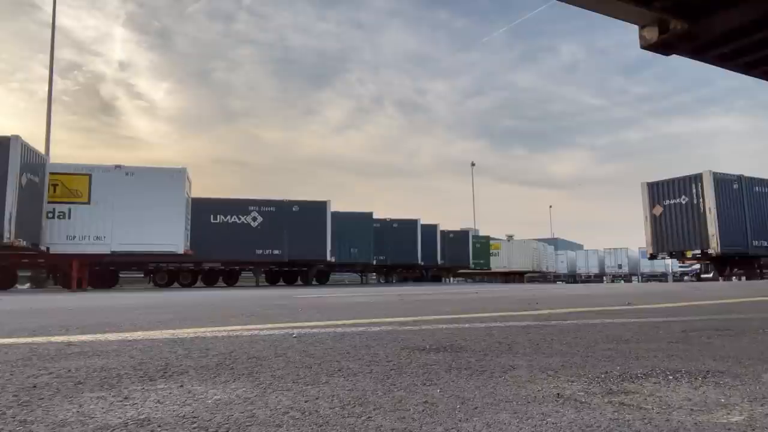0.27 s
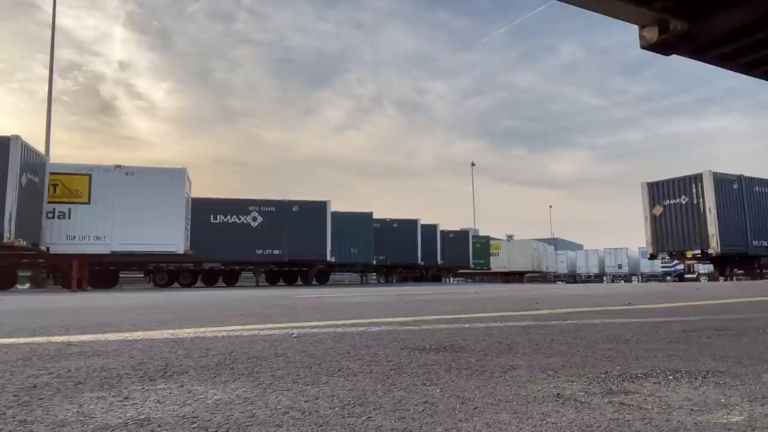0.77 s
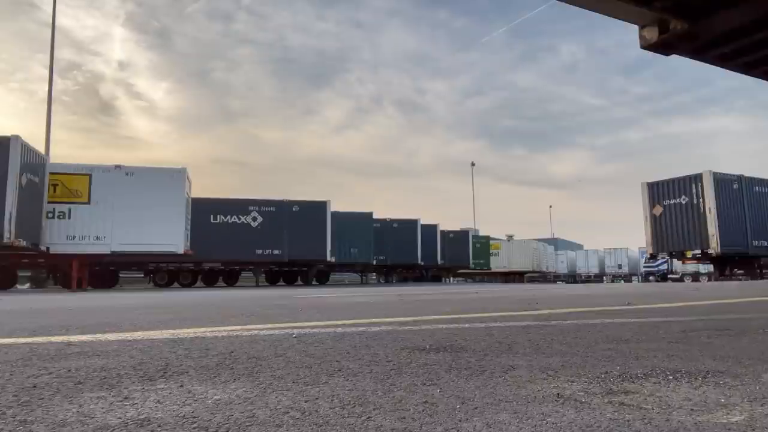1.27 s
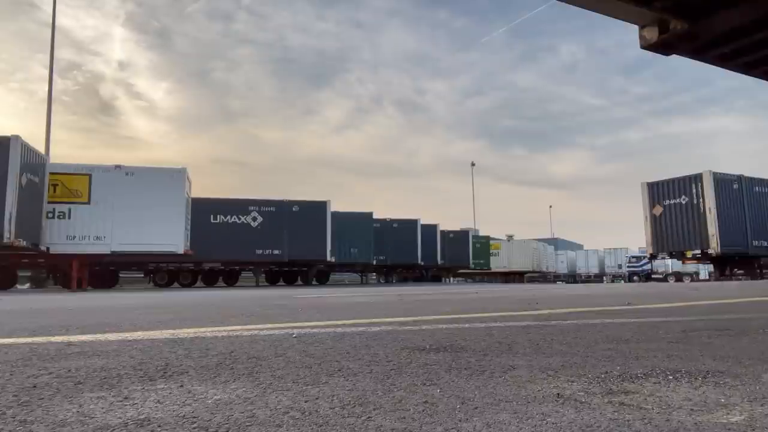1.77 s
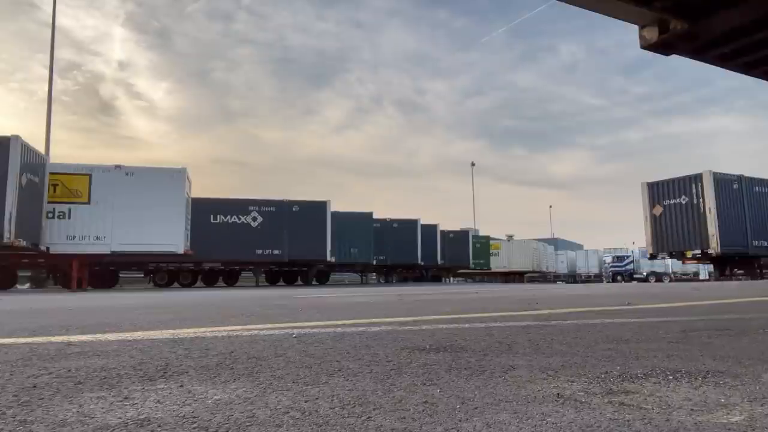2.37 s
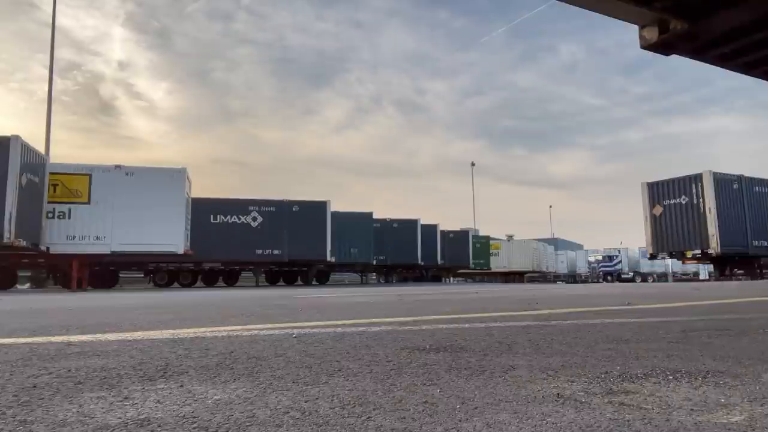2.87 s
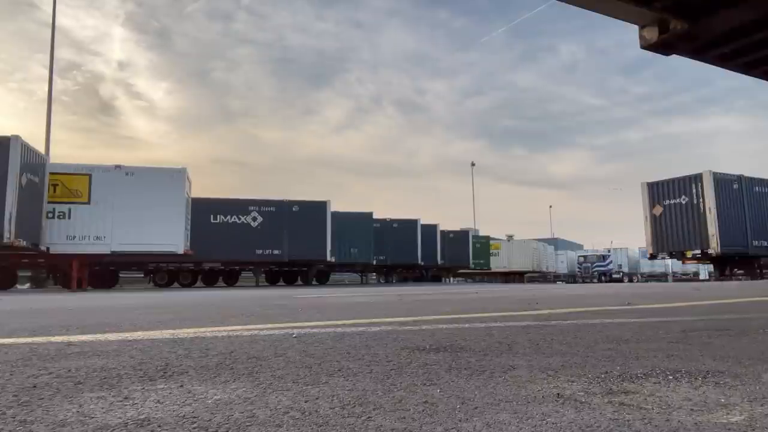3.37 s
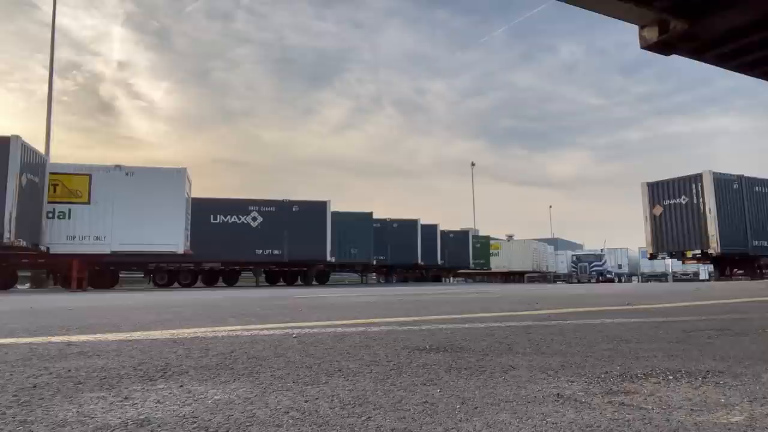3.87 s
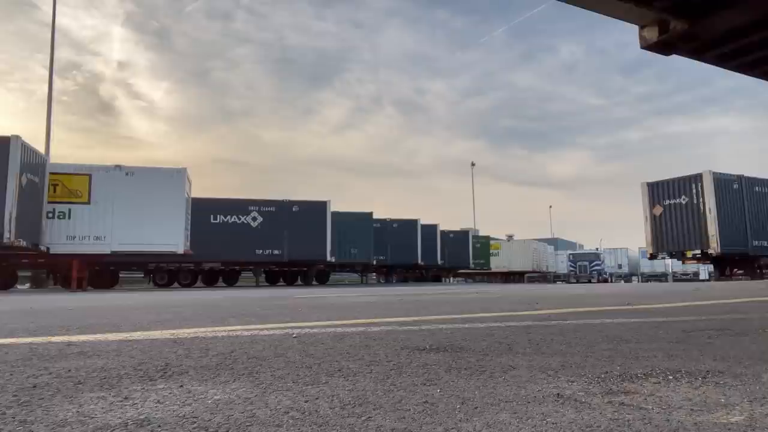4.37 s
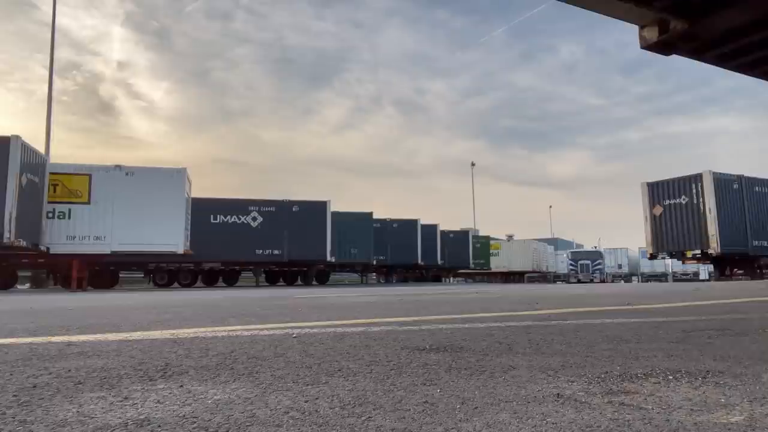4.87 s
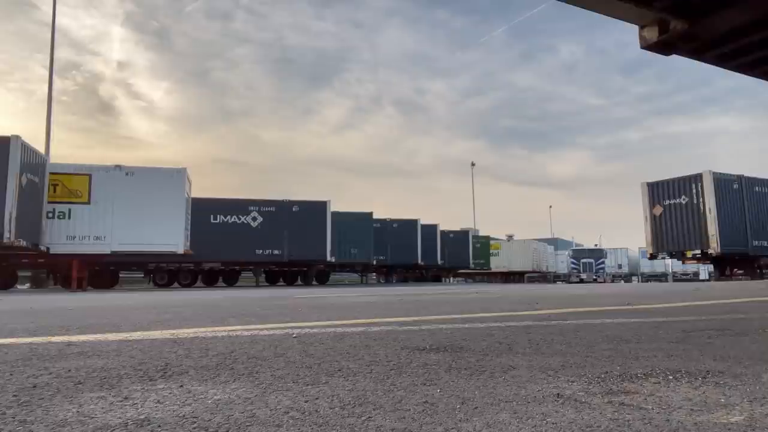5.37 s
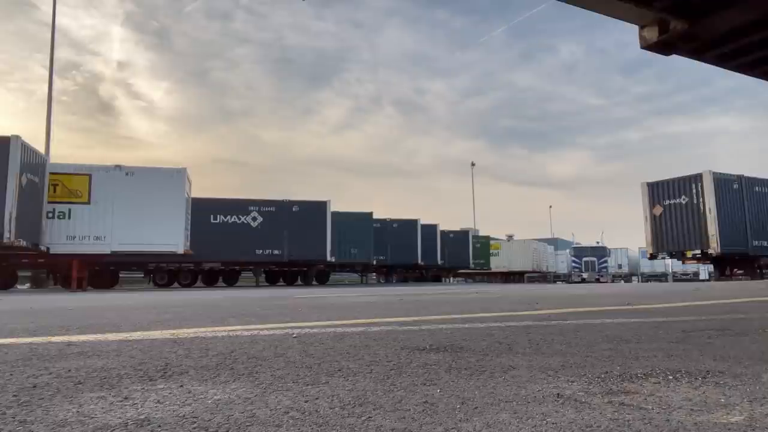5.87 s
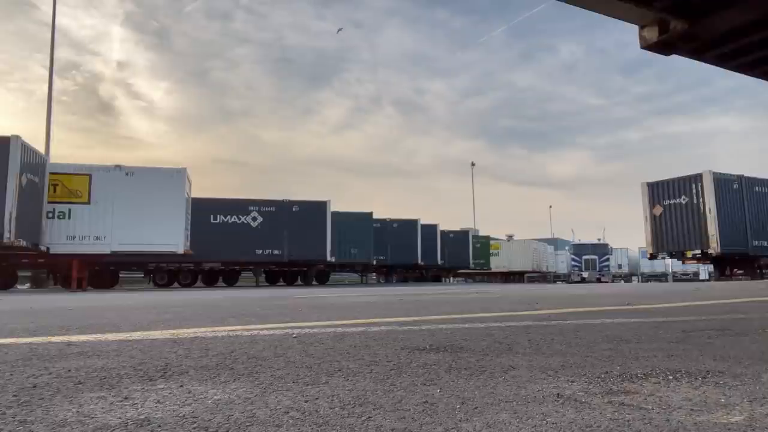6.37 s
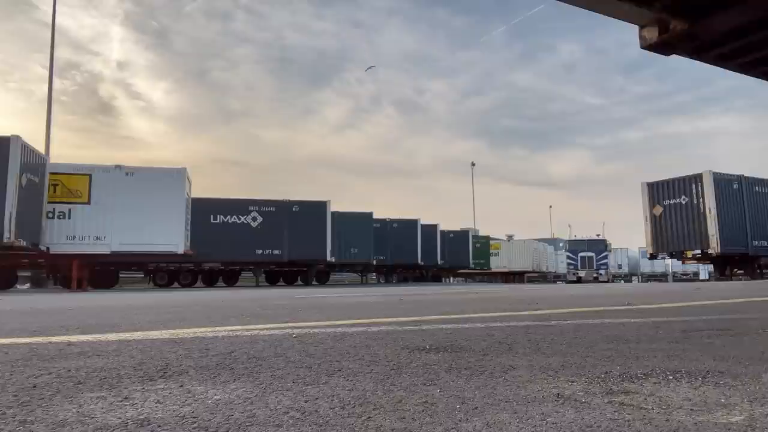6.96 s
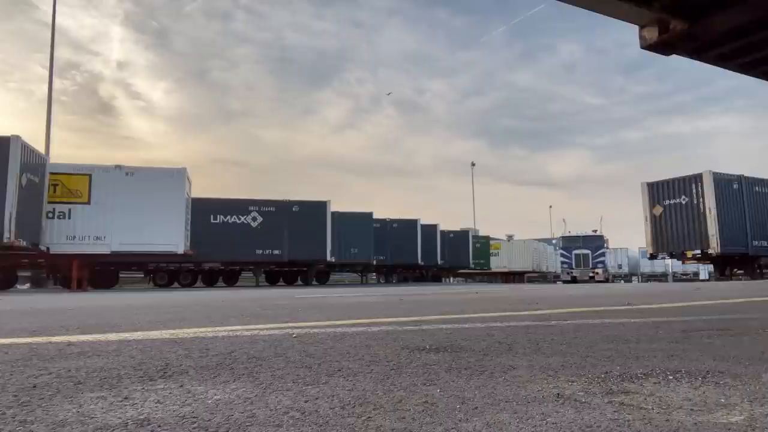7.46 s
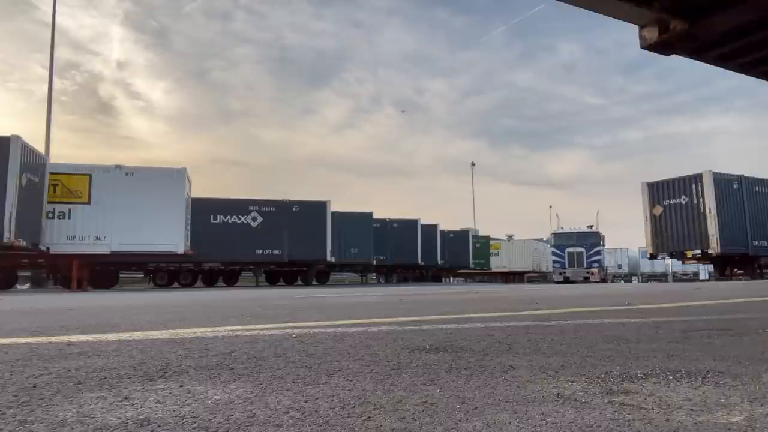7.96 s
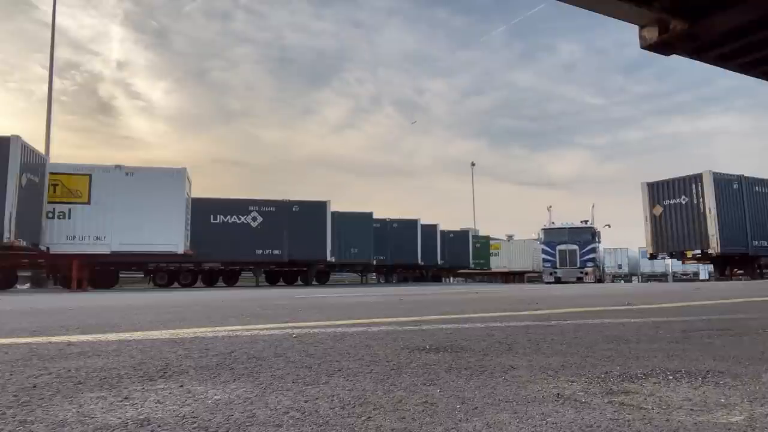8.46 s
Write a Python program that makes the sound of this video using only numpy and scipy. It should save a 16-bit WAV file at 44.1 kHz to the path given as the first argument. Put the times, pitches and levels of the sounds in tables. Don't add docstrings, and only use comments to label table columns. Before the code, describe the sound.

Over low yard rumble, a big six-cylinder engine eases, pulls harder and climbs with a breathy turbo whine, nearing until its note sinks.

```python
import sys
import numpy as np
from scipy import signal
from scipy.fft import rfft, irfft, next_fast_len
from scipy.io import wavfile
from scipy.ndimage import uniform_filter1d, map_coordinates

SR = 44100
rng = np.random.default_rng(int(sys.argv[2]) if len(sys.argv) > 2 else 0)


def volts_from_db(level):
    exponent = np.asarray(level, float) / 20
    return 10 ** exponent


def materialize(psi):
    bounded = np.clip(np.atleast_2d(psi).T, -1, 1)
    quanta = np.round(bounded * 32767).astype(np.int16)
    wavfile.write(sys.argv[1], SR, quanta)


N = 383669

# (frequency [Hz], level [dB per Hz])
RUMBLE_SPECTRUM = [(20, -42), (35, -12), (55, -4.5), (90, -6.5), (130, -4), (250, -7), (450, -14),
                   (900, -120)]
# (time [s], level [dB])
IDLER_LEVEL = [(0, -26), (.55, -20), (.9, -26), (1.2, -31), (2, -29.5), (3, -32.5), (8.7, -50.5)]
# (frequency [Hz], level [dB])
IDLER_LINES = [(45, -15.5), (68, -1), (78, -7.5), (91, -1.5)]
# (time [s], level [dB])
INSECT_LEVEL = [(0, -83), (3.8, -84), (4.4, -76.5), (6.2, -76), (7.2, -82), (8.7, -84)]
# (time [s], peak level [dB], frequency [Hz])
GRIT_TICKS = [
    (0.9767, -57, 7450),
    (0.981, -58, 8350),
    (1.2818, -54, 8320),
    (1.9535, -57, 7150),
    (2.006, -54, 7270),
]
# (start [s], end [s], from [Hz], to [Hz], level [dB])
SWEPT_BANDS = [(2.1, 3.1, 5200, 5700, -64), (4.45, 5.9, 5900, 6350, -59), (5.5, 6.1, 2500, 3300, -50),
               (6.2, 6.8, 2700, 3500, -47), (6.95, 7.5, 2300, 3100, -48), (7.85, 8.7, 2500, 4300, -46),
               (7.85, 8.75, 2750, 2900, -46), (8.3, 9, 3000, 3700, -47), (7.8, 8.9, 2100, 2150, -45),
               (5.15, 5.7, 1450, 1550, -44), (7.8, 9.1, 1500, 1850, -37)]
# (frequency [Hz], level [dB per Hz])
ROAR_SPECTRUM = [(160, -14), (280, -3.5), (343, -2.5), (376, -5), (455, -3.5), (615, 1.5), (892, -6.5),
                 (1500, -24), (1950, -55.5), (3300, -120)]
# (frequency [Hz], level [dB per Hz])
CLATTER_SPECTRUM = [(500, -57.5), (900, 0), (1600, 1.5), (2200, -4), (3200, -10.5), (4500, -16),
                    (6000, -30), (8000, -58.5), (10000, -120)]
# (frequency [Hz], level [dB per Hz])
HISS_SPECTRUM = [(3000, -65.5), (5000, 0.5), (7000, 0), (8500, -8), (10000, -16.5), (12000, -20.5),
                 (13500, -35.5), (15000, -120)]
# (frequency [Hz], left-right correlation [-1 to 1])
LIKENESS = [(60, 0.9), (150, .93), (300, 0.39), (500, 0.69), (800, 0.94), (1500, 0.39), (4000, 0.43),
            (7500, 0.08), (9000, 0.35)]
# (time [s], blade tone [Hz], level [dB])
TURBO_BLADES = [(0, 3600, -62), (1, 3450, -60), (1.1, 3460, -48.5), (1.38, 3515, -52), (1.52, 3590, -46.5),
                (1.9, 3720, -47), (2.25, 3780, -53), (2.7, 3890, -52), (3.1, 4080, -58), (4.55, 4620, -60),
                (5.5, 5740, -58), (6, 6030, -57), (6.5, 6600, -58), (7.3, 7180, -56.5), (7.8, 7330, -57),
                (8.05, 6960, -51.5), (8.4, 6500, -49), (8.7, 6370, -49)]
# (time [s], crank rate [Hz])
CRANK_SPEED = [(0, 17.6), (.9, 16.7), (1.3, 17.4), (1.75, 17.8), (2.2, 17.85), (2.65, 19), (3.15, 20.2),
               (4, 22.5), (4.43, 24.7), (4.87, 26.7), (5.5, 29.2), (5.95, 30.75), (6.38, 31.45),
               (6.75, 32.9), (7.35, 34.3), (7.6, 34.2), (7.95, 33.5), (8.7, 27.5)]
# (time [s], position [0-1])
PEDAL = [
    (0, 1),
    (1, 0.5),
    (2, 0.88),
    (7.85, 1),
    (8.3, 0),
    (8.7, 0.1),
]
# (time [s], level [dB])
FIRING_LEVEL = [(0, -27.5), (.9, -30), (1.14, -23), (1.4, -33.5), (1.74, -24.5), (2.15, -29), (2.9, -22.5),
                (3.15, -25.5), (3.4, -21.5), (3.6, -21.5), (3.9, -17.5), (4.43, -12), (5.2, -12.5),
                (5.94, -15), (6.1, -16), (7.4, -17.5), (7.8, -14.5), (8.2, -29.5)]
# (time [s], half width [s], depth [dB])
FIRING_NULLS = [
    (1.24, 0.034, 25),
    (4.02, 0.08, 8.5),
    (7.06, 0.096, 6),
    (7.47, 0.053, 4),
    (7.631, 0.11, 18.5),
    (8.14, 0.057, 16.5),
]
# (start [s], end [s], level [dB])
FIFTH_SWELLS = [(1, 1.95, -28), (5.2, 5.85, -35.5), (5.95, 6.24, -28), (6.85, 7.4, -27.5), (7.3, 8.3, -25),
                (8.3, 8.7, -30)]
# (start [s], end [s], level [dB])
SIXTH_GAPS = [(.6, 1.294, -33), (1.193, 2.301, -32.5), (2.7, 3.1, -33), (3.199, 3.534, -26),
              (4.118, 4.86, -18), (4.89, 5.3, -24), (5.25, 5.751, -22.5), (5.619, 6.089, -14.5),
              (5.963, 6.26, -16.5), (6.347, 6.862, -18), (6.88, 7.023, -28), (7.036, 7.298, -31),
              (7.63, 7.77, -27), (7.788, 8.068, -27), (8.16, 8.38, -35), (8.455, 8.906, -30.5)]
# (start [s], end [s], level [dB])
NINTH_GAPS = [(2.45, 3.01, -30), (2.85, 3.765, -27), (3.7, 4.45, -28.5), (4.404, 5.238, -18.5),
              (5.145, 5.839, -30.5), (5.944, 6.239, -29), (7.2, 7.6, -32.5), (8.512, 8.885, -30)]
ORDER_BED_DB = [
    -43.5,
    -37,
    -47.5,
]
# (crank order [-], level under load [dB], level coasting [dB])
UNEVEN_ORDERS = [(2.12, -19.5, -5), (4.17, -15, -3.5), (6.58, -4.5, -11), (7.87, -3, 0),
                 (10.01, -7.5, -11.5), (11.29, -6, -4.5), (11.79, -11, -11), (15.21, -13, -21.5),
                 (15.98, -1, -21.5), (17.04, -15, -9), (17.8, -8.5, -10.5), (19.66, -6, -11),
                 (21.05, -9, -10), (20.9, -1, -15), (22.05, -9.5, -14)]
# (centre [Hz], width [Hz], gain [dB])
STACK_MODES = [(116, 13, 3), (190, 35, -1), (210, 34, -2.5), (355, 9.4, -18), (630, 110, 1)]
# (start [s], end [s], crank order [-], level [dB])
ORDER_BLOOMS = [(2.2, 3.2, 12, -31), (3.4, 4.0, 7, -28), (3.7, 4.3, 12, -31), (4.0, 4.5, 8, -27),
                (4.2, 5.3, 12, -30), (5.2, 6.2, 8, -24), (5.8, 6.3, 13, -33), (6.3, 6.8, 12, -34),
                (6.5, 7.7, 7, -25), (6.9, 7.3, 8, -31), (7.3, 8.0, 8, -27), (7.3, 7.9, 11, -32),
                (7.85, 8.4, 2, -27), (8.0, 8.45, 8, -30), (8.25, 8.9, 4, -21.5)]
# (time [s], gain [dB])
NEARNESS = [(0, 1.5), (.9, 1), (1.2, 2.5), (2.7, 4), (3.6, 4), (5.2, 6), (5.9, 7.5), (6.35, 8), (7.2, 8.5),
            (7.82, 9), (8.05, 11), (8.3, 11), (8.7, 10.5)]
# (time [s], lag [s])
LEFT_LAG = [(0, 0.00034), (1.5, 0.00029), (4, 0.00017), (6, 0.00013), (8.7, 0.00004)]
# (frequency [Hz], left minus right [dB])
PORT_TILT = [(60, 0.5), (140, 2.5), (300, 1.5), (690, -4), (1540, -1), (3480, -1.0), (7840, -4)]
# (frequency [Hz], left phase lead [rad])
PORT_TWIST = [(250, -0.072), (700, -0.78), (1200, 0.04), (2200, -0.62), (4000, 0.085)]
# (frequency [Hz], side share kept [0-1])
SIDE_SHARE = [(8000, 1), (8700, .05), (10600, .05), (11200, 1)]


def unit(x):
    return x / np.sqrt(np.mean(x ** 2) + 1e-20)


def along(points, hz):
    point_hz, value = np.transpose(points)
    return np.interp(np.log(hz + 1), np.log(point_hz + 1), value)


def curves(rows):
    time_s, *columns = np.transpose(rows)
    return [np.interp(np.arange(N) / SR, time_s, column) for column in columns]


def pedal_position():
    return np.clip(curves(PEDAL)[0], 0, 1)


def wobble(rate_hz):
    at = np.arange(0, N + 16, 16)
    knots = rng.standard_normal(N // 80)
    return np.interp(np.arange(N), at, map_coordinates(knots, [at * rate_hz / SR]))


def turns(hz):
    return 2 * np.pi * np.cumsum(hz) / SR


def swell(start_s, end_s):
    progress = np.clip((np.arange(N) / SR - start_s) / (end_s - start_s), 0, 1)
    return progress, np.sin(np.pi * progress)


def power_sum(*levels_db):
    return 10 * np.log10(sum(volts_from_db(db) ** 2 for db in levels_db))


def filtered(x, response):
    edge = 4096
    wide = np.pad(x, [(0, 0)] * (x.ndim - 1) + [(edge, edge)], mode="reflect")
    m = next_fast_len(N + 2 * edge)
    spectrum = rfft(wide, m) * response(np.fft.rfftfreq(m, 1 / SR))
    return irfft(spectrum, m)[..., edge:edge + N]


def rush(spectrum, patchy_db):
    z = signal.stft(rng.standard_normal((2, N)), nperseg=512)[2]
    field = uniform_filter1d(rng.standard_normal(z.shape[1:]), size=5, axis=0)
    field = uniform_filter1d(field, size=12, axis=1)
    pair = signal.istft(z * volts_from_db(patchy_db * unit(field)), nperseg=512)[1][:, :N]

    def mid_side_response(hz):
        angle = np.arccos(np.clip(along(LIKENESS, hz), -1, 1)) / 2
        return volts_from_db(along(spectrum, hz)) * [np.cos(angle), np.sin(angle)]

    mid, side = filtered(pair, mid_side_response)
    return unit(np.array([mid + side, mid - side]))


def line(phase, db, drift, flutter_db):
    apart = drift * wobble(3) * np.array([[1], [-1]])
    shake = rng.uniform(0, 2 * np.pi) + 1.7 * drift * wobble(9)
    return np.sqrt(2) * volts_from_db(db + flutter_db * wobble(11)) * np.sin(phase + shake + apart)


def band(hz, db, smear_hz, count):
    tones = sum(line(turns(hz + smear_hz * wobble(400)), db, .4, 1.5) for _ in range(count))
    return tones / np.sqrt(count)


def yard(rumble_db):
    idle_db, = curves(IDLER_LEVEL)
    out = volts_from_db(rumble_db + 0.3 * wobble(4)) * rush(RUMBLE_SPECTRUM, patchy_db=2.2)
    for hz, db in IDLER_LINES:
        out += line(turns(np.full(N, hz)), idle_db + db, .12, 2.5)
    for hz in (9517, 9684):
        out += line(turns(hz + 25 * wobble(90)), curves(INSECT_LEVEL)[0], .2, .8)
    t = np.arange(600) / SR
    for start_s, db, hz in GRIT_TICKS:
        envelope = volts_from_db(db + 8 - 60 * t / .04) * np.sin(np.pi * t / t[-1]) ** .3
        out[:, round(start_s * SR):][:, :len(t)] += envelope * np.sin(2 * np.pi * hz * t)
    return out


def streaks():
    out = 0
    for start_s, end_s, from_hz, to_hz, db in SWEPT_BANDS:
        progress, arch = swell(start_s, end_s)
        hz = from_hz + (to_hz - from_hz) * progress
        out = out + arch * band(hz, db, smear_hz=60 + .02 * from_hz, count=3)
    return out


def noise_levels(crank_hz):
    near_db, pedal = curves(NEARNESS)[0], pedal_position()
    spool_hz = 22.7
    yard_db = -26 - 0.1 * np.arange(N) / SR
    boom_db = curves(FIRING_LEVEL)[0] - 14.5
    coast_db = -4 * (1 - pedal) * (crank_hz > spool_hz)
    roar_db = -37 + 1.147 * near_db + coast_db
    clatter_db = -45.5 + near_db
    flow_db = -86.5 + 2.06 * near_db + 0.634 * np.maximum(crank_hz - spool_hz, 0)
    facing_db = -74.5 + 10 * np.log10(swell(0.61, 3.35)[1] + 1e-6)
    hiss_floor_db = -81
    return power_sum(yard_db, boom_db), roar_db, clatter_db, power_sum(flow_db, facing_db, hiss_floor_db)


def engine_noise(firing, roar_db, clatter_db, hiss_db):
    def beat(depth):
        return 1 + depth * np.cos(firing + .7 * wobble(6))

    surge_db = .4 * wobble(8)
    roar = volts_from_db(roar_db + 1.5 + surge_db) * beat(0.29) * rush(ROAR_SPECTRUM, patchy_db=0.76)
    clatter = volts_from_db(clatter_db + 4.5 + 0.35 * wobble(9)) * beat(0.037) * rush(CLATTER_SPECTRUM, patchy_db=1.46)
    hiss = volts_from_db(hiss_db + 10.0 + 0.48 * wobble(21)) * beat(0.083) * rush(HISS_SPECTRUM, patchy_db=1.9)
    return roar + clatter + hiss


def turbo(firing):
    blade_hz, db = curves(TURBO_BLADES)
    smear_min_hz, smear_top_hz, calm_hz, roughens_hz = 35, 230, 3420, 1300
    smear_hz = smear_top_hz - (smear_top_hz - smear_min_hz) * np.exp((calm_hz - blade_hz) / roughens_hz)
    smear_hz += 8 * np.maximum(db + 54, 0) * (blade_hz > calm_hz + 100)
    coast_smear = .6
    driven = coast_smear + (1 - coast_smear) * pedal_position()
    smear_hz *= np.where(blade_hz > 5000, driven, 1)
    kick = ((1 + np.cos(firing + .5 * wobble(9.2))) / 2) ** 2
    clean = turns(blade_hz - .3 * smear_hz + smear_hz * (.6 * kick + .3 * wobble(60)))
    out = (.7 + .6 * kick) * line(clean, db + 4.5 - smear_hz / 30, .3, 1.5)
    out += (.5 + 1.1 * kick) * band(blade_hz + 1.3 * smear_hz, db + .5, 1.05 * smear_hz, count=4)
    octave_db = db - 26.0 - blade_hz / 150 + 17.5
    return out + band(2 * blade_hz, octave_db, 2.7 * smear_hz, count=2)


def orders():
    t = np.arange(N) / SR
    firing_db = curves(FIRING_LEVEL)[0]
    for null_s, half_s, depth_db in FIRING_NULLS:
        firing_db = firing_db - depth_db * np.clip(1 - abs(t - null_s) / half_s, 0, 1)
    levels_db = [firing_db]
    for bed_db, gaps in zip(ORDER_BED_DB, (FIFTH_SWELLS, SIXTH_GAPS, NINTH_GAPS)):
        gain = volts_from_db(bed_db + wobble(5))
        for start_s, end_s, db in gaps:
            gain = gain + volts_from_db(db) * abs(swell(start_s, end_s)[1]) ** .7
        levels_db.append(20 * np.log10(gain))
    return levels_db


def exhaust(crank_hz, levels_db, roar_db):
    crank, pedal = turns(crank_hz), pedal_position()
    out = sum(line(k * crank, db, .01 * k, .6) for k, db in zip((3, 5, 6, 9), levels_db))
    for k, load_db, coast_db in UNEVEN_ORDERS:
        stack = sum(volts_from_db(gain_db) / np.hypot(1, (k * crank_hz - centre_hz) / (width_hz / 2))
                    for centre_hz, width_hz, gain_db in STACK_MODES)
        db = roar_db - 6.5 + pedal * load_db + (1 - pedal) * coast_db
        out += stack * line(k * crank, db + 1.5 * wobble(2.5), drift=0.034 * k, flutter_db=3.0)
    for start_s, end_s, k, db in ORDER_BLOOMS:
        arch = swell(start_s, end_s)[1]
        out += arch * line(k * crank, db - .1, drift=0.007 * k, flutter_db=1.1)
    return out


def scene():
    crank_hz, levels_db = curves(CRANK_SPEED)[0], orders()
    rumble_db, roar_db, clatter_db, hiss_db = noise_levels(crank_hz)
    firing = turns(3 * crank_hz)
    mix = yard(rumble_db) + streaks()
    mix += engine_noise(firing, roar_db, clatter_db, hiss_db)
    mix += turbo(firing) + exhaust(crank_hz, levels_db, roar_db)
    late = np.arange(N) - curves(LEFT_LAG)[0] * SR
    left = map_coordinates(mix[0], [late], order=5, mode="nearest")
    return np.array([left, mix[1]])


def top_cut(x):
    return signal.sosfilt(signal.butter(12, 13100, fs=SR, output="sos"), x)


def record(dry):
    def port_response(hz):
        difference = volts_from_db(along(PORT_TILT, hz)) * np.exp(1j * along(PORT_TWIST, hz))
        return difference ** np.array([[.5], [-.5]])

    left, right = filtered(dry, port_response)
    mid = (left + right) / 2
    side = filtered((left - right) / 2, lambda hz: along(SIDE_SHARE, hz))
    pair = np.array([mid + side, mid - side])
    pair = pair / (1 + abs(pair / .92) ** 6) ** (1 / 6)
    return top_cut(pair)


dry = scene()
out = record(dry)
materialize(out)
```